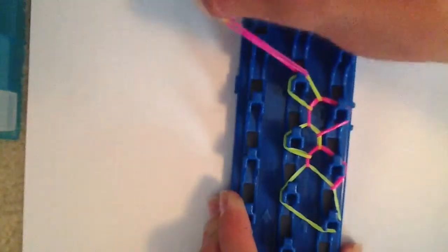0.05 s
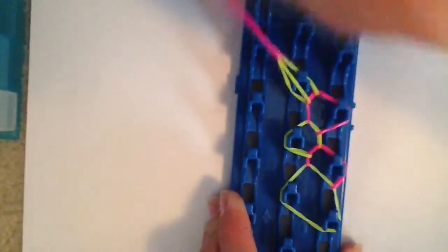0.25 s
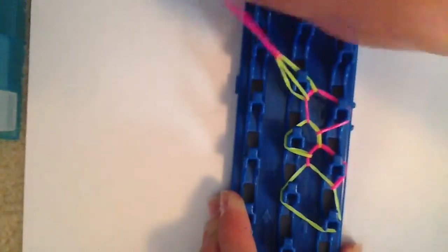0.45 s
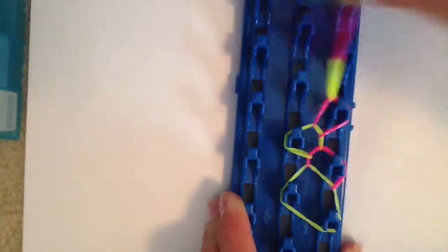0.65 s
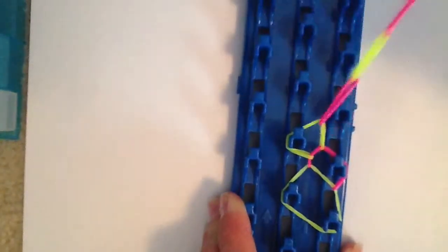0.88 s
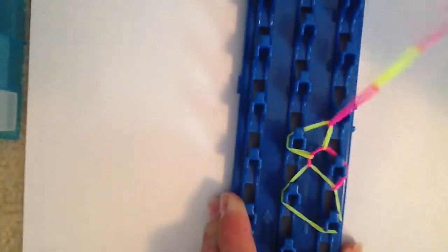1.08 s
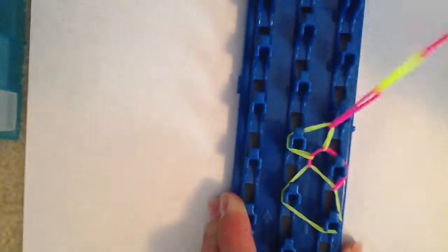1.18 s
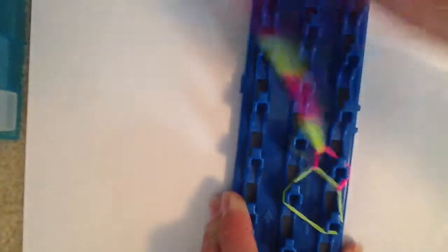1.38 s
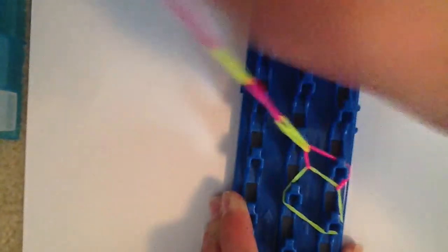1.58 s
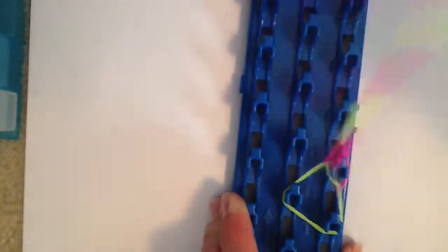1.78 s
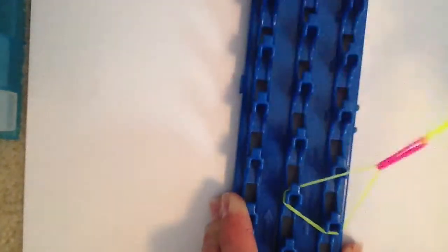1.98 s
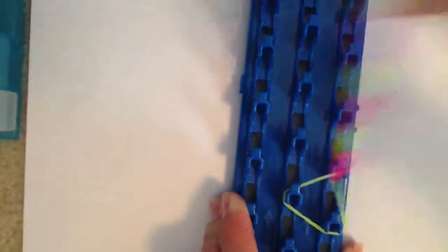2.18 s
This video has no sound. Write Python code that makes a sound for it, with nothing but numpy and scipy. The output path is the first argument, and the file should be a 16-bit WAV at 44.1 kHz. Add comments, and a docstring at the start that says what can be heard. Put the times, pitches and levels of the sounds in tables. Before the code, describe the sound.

Rubber bands snap off the pegs of a plastic loom, close to the microphone. After a soft rub, a sharp snap with a brief twang comes at 0.2 seconds. Four lighter snaps follow from 0.6 to 0.8. Soft rubbing leads to a double snap at 1.35, a sharp snap at 1.8 and a faint, higher twang at 1.9. The small room holds a faint rumble, hiss and hum.

```python
"""A chain of rubber bands is pulled off the pegs of a plastic loom on a table, close to the microphone.
Rubber rubs softly, then at 0.2 s a band slips off its peg, slaps the plastic and twangs briefly.
Four lighter snaps follow from 0.6 to 0.8 s. More rubbing leads to a double snap at 1.35 s,
then to a sharp snap at 1.8 s and a last faint one with a higher twang.
Throughout, a small room answers, over a low rumble, a steady hiss and a faint mains hum."""
import sys
import numpy as np
from scipy import signal
from scipy.fft import rfft, irfft, next_fast_len
from scipy.io import wavfile

SR = 44100
rng = np.random.default_rng(int(sys.argv[2]) if len(sys.argv) > 2 else 0)


def dump_mix(stems):
    """Bounce the given channels to the path in sys.argv[1] as a 16-bit WAV at rate SR."""
    frames = np.atleast_2d(stems).T  # one column per channel
    limited = np.clip(frames, -1, 1)  # hard clip at full scale
    pcm = np.round(limited * 32767).astype(np.int16)
    wavfile.write(sys.argv[1], SR, pcm)


N = 99225
ATTACK_S, PLUCK_S = 0.00031, 0.002

# centre_hz of thud, knock, clack, crack, air
REGION_CENTRES_HZ = [340, 1300, 3400, 9000, 13500]
# start_s, chatter_s, t60_s, peg_hz, peg_db, boom_db, thud_db, knock_db, clack_db, crack_db, air_db
BAND_SNAPS = [(.2059, 0.0032, 0.029, 1410, -24.5, -55, -34, -26.5, -23, -24.5, -18),
              (0.5725, .003, 0.047, 1170, -52, -65, -42.5, -42, -43, -40.5, -56),
              (0.5931, 0.0015, 0.017, 9750, -24.5, -53.5, -40, -33, -29.5, -24.5, -25.5),
              (0.7479, 0.00044, 0.033, 3890, -37, -54, -68, -53.5, -35.5, -44, -40.5),
              (.8108, 0.0015, 0.043, 1040, -42.5, -47, -38.5, -34, -36.5, -39.5, -45),
              (1.3416, 0.009, 0.032, 2850, -42, -58.5, -56, -37, -44.5, -45, -50),
              (1.354, .005, 0.031, 2077, -40, -48, -44.5, -40, -38.5, -69, -61),
              (1.7706, 0.0052, .017, 2120, -32.5, -78, -40.5, -36, -29.5, -33.5, -36),
              (1.925, 0.0034, 0.015, 4520, -49, -75, -81, -53.5, -44.5, -57.5, -66)]
def snaps():
    """Bands slip off and slap the plastic; loom and peg ring, and the room answers."""
    t, out = np.arange(SR // 3) / SR, np.zeros(N)
    for start_s, chatter_s, t60_s, peg_hz, peg_db, boom_db, *region_db in BAND_SNAPS:
        colour = list(zip(REGION_CENTRES_HZ, region_db))
        hit = slap(t, chatter_s, t60_s, colour)
        ring = loom_ring(t, colour) + peg_ring(t, peg_hz, peg_db) + loom_boom(t, boom_db)
        add(out, start_s, room(hit, send_db=3.5) + room(ring, send_db=1.5))
    return out


# freq_hz, gain_db
SLAP_SPECTRUM = [(30, -36), (70, -47), (150, 1.5), (300, 9), (800, 1.5), (1400, -3), (2500, 0.5),
                 (3400, -2), (5000, -4), (6500, -5), (9500, 0), (14000, -0.5), (15500, -3.5)]
def slap(t, chatter_s, t60_s, colour, split_hz=4500, slow_share=0.61, gain_db=1.5):
    """Rubber chatters against a peg; the lows die in one stage, the treble in two."""
    noise = rng.standard_normal(len(t))
    low = filtered(noise, lambda hz: 1 / (1 + (hz / split_hz) ** 4))
    decay_db = -60 * np.maximum(t - chatter_s, 0) / t60_s
    treble_decay = (1 - slow_share) * amp(decay_db / 0.37) + slow_share * amp(decay_db)
    chatter = onset(t, ATTACK_S) * (low * amp(decay_db / 0.94) + (noise - low) * treble_decay)
    return causal(chatter, lambda hz: amp(gain_db + along(SLAP_SPECTRUM, hz) + along(colour, hz)), 8192)


# pitch_hz, level_db
LOOM_MODES = [(335, -9), (600, -19), (690, -17), (1130, -11), (1460, -15), (1740, -18), (2060, -13),
              (2400, -14), (3290, -7), (3600, -11), (4200, -8), (7500, -8), (9700, -9), (11100, -11),
              (13400, -11)]
def loom_ring(t, colour, t60_at_1khz_s=0.06, scatter_db=4, gain_db=1):
    """Higher loom modes die sooner and smear more; each blow excites them a little differently."""
    ring = np.zeros(len(t))
    for hz, mode_db in LOOM_MODES:
        struck_db = gain_db + mode_db + along(colour, hz) + rng.normal(0, scatter_db)
        decay_db = -60 * t / t60_at_1khz_s * np.sqrt(hz / 1000)
        phase = 2 * np.pi * hz * t + phase_drift(t) * np.sqrt(hz / 3240)
        ring += amp(struck_db + decay_db) * np.sin(phase)
    return ring * onset(t, ATTACK_S)


def peg_ring(t, pitch_hz, level_db, t60_s=0.021, rise_s=0.00023):
    """The struck peg rings briefly in one smeared mode."""
    tone = np.sin(2 * np.pi * pitch_hz * t + phase_drift(t))
    return amp(level_db - 60 * t / t60_s) * tone * onset(t, rise_s)


def phase_drift(t, width_hz=52):
    """Slipping rubber touches a ring and makes its phase wander."""
    return np.cumsum(rng.standard_normal(len(t))) * np.sqrt(2 * np.pi * width_hz / SR)


# pitch_hz, level_db, t60_s
BOOM_MODES = [(341.2, -0.5, 0.2), (360, -25, .13), (431, -16, 0.18)]
def loom_boom(t, level_db):
    """Low modes of the loom on the table."""
    boom = sum(amp(db - 60 * t / t60_s) * np.sin(2 * np.pi * hz * t) for hz, db, t60_s in BOOM_MODES)
    return amp(level_db) * boom * onset(t, PLUCK_S)


# start_s, settled_hz, pitch_offset_share, level_db, t60_s, free_s, overtone_db
BAND_TWANGS = [(.209, 360, 0.063, -43, 0.71, 0.06, -19.5), (0.573, 226, 0.2, -47.5, 0.24, 0.11, -16),
               (.595, 349.3, 0.035, -49.5, 0.44, 0.02, -2.5),
               (0.747, 339.3, -0.0091, -51.5, 0.24, 0.066, -9.5),
               (.812, 306.7, -0.063, -48.5, 0.38, 0.185, -8.5),
               (1.346, 268, -0.16, -55.5, 0.34, 0.052, -36), (1.9263, 709, -0.069, -42, 0.092, .06, -6)]
def twangs(settle_s=0.014, mute_s=0.013, overtone_damping=0.46):
    """Each freed band settles to its new tension and rings until it touches something."""
    t, out = np.arange(SR // 3) / SR, np.zeros(N)
    for start_s, settled_hz, offset_share, level_db, t60_s, free_s, overtone_db in BAND_TWANGS:
        pitch_hz = settled_hz * (1 + offset_share * np.exp(-t / settle_s))
        phase = 2 * np.pi * np.cumsum(pitch_hz) / SR
        envelope = onset(t, PLUCK_S) * np.exp(-np.maximum(t - free_s, 0) / mute_s)
        tone = sum(amp(db - 60 * t / t60_s * (1 + overtone_damping * k)) * np.sin((k + 1) * phase)
                   for k, db in enumerate([0, overtone_db, overtone_db - 4.5]))
        add(out, start_s, room(amp(level_db) * envelope * tone, send_db=-4))
    return out


# freq_hz, gain_db
RUB_SPECTRUM = [(200, -18), (900, -6.5), (1700, -8), (2600, 1), (3400, -1), (5000, -9.5), (9000, -8.5),
                (15000, -10)]
# peak_s, rise_s, fall_s, level_db, tilt_db_per_octave
RUB_SWELLS = [(.005, .02, 0.031, -65.5, -1.5), (0.741, 0.019, 0.0061, -60.5, -1),
              (0.743, 0.0026, 0.0052, -48, 2), (0.8118, 0.0017, 0.0052, -45, -3.5),
              (1.223, 0.05, 0.06, -58, 0), (1.335, .012, .01, -61.5, 6.5), (1.654, .002, .003, -57, 7),
              (1.675, 0.067, 0.063, -65, 1.5), (1.724, 0.0046, 0.0035, -60, -3)]
def rubbing(grain_db=1, grain_rate_hz=500):
    """Grainy friction swells as stretched rubber creeps over the pegs."""
    t, out = np.arange(N) / SR, np.zeros(N)
    for peak_s, rise_s, fall_s, level_db, tilt in RUB_SWELLS:
        noise = rng.standard_normal(N)
        hiss = filtered(noise, lambda hz: amp(along(RUB_SPECTRUM, hz) + tilt * np.log2(hz / SR + 1e-3)))
        grain = np.interp(t * grain_rate_hz, np.arange(N), rng.standard_normal(N))
        swell = np.exp(-((t - peak_s) / np.where(t < peak_s, rise_s, fall_s)) ** 2)
        out += amp(level_db) * swell * unit(hiss * amp(grain_db * grain))
    return out


# freq_hz, t60_s
ROOM_DECAY = [(200, 0.36), (1000, .28), (3500, 0.31), (9000, 0.37), (15000, 0.19)]
# freq_hz, gain_db
ROOM_SPECTRUM = [(150, -13), (400, 6), (1200, -1.5), (3300, -3.5), (6000, -4), (10000, -4), (15000, -5.5)]
def room(x, send_db, tail_db=-19.5, build_s=0.011, wall_db=5.5, wall_s=0.033, spread_s=0.0074):
    """Direct sound plus a short diffuse tail that swells as the nearest walls answer."""
    hz, t, spectra = signal.stft(rng.standard_normal(SR // 2), SR, nperseg=256)
    swell = onset(t, build_s) * amp(wall_db * np.exp(-((t - wall_s) / spread_s) ** 2))
    decay = amp(-60 * t / along(ROOM_DECAY, hz)[:, None])
    tail = signal.istft(spectra * decay * swell, SR, nperseg=256)[1]
    tail /= np.linalg.norm(tail)
    response = amp(tail_db + send_db) * causal(tail, lambda f: amp(along(ROOM_SPECTRUM, f)))
    response[0] += 1  # direct path
    return signal.fftconvolve(x, response)


# freq_hz, relative_density_db
FLOOR_SPECTRUM = [(15, -51), (25, -26), (38, -30), (129, 1), (183, -2.5), (226, -8.5), (266, -8),
                  (339, -14.5), (409, -14), (468, -16.5), (682, -16.5), (1750, -20), (3330, -20),
                  (14200, -20), (15400, -20.5)]
TOP_HZ = 15450
def background(noise_db=-65, hum_db=-80, hum_hz=120):
    """Room rumble, microphone hiss and a faint mains hum."""
    noise = filtered(rng.standard_normal(N), lambda hz: amp(along(FLOOR_SPECTRUM, hz)) * (hz < TOP_HZ))
    hum = np.sin(2 * np.pi * hum_hz * np.arange(N) / SR)
    return amp(noise_db) * unit(noise) + amp(hum_db) * hum


def amp(db):
    """Decibels to gain."""
    return 10 ** (np.asarray(db) / 20)


def unit(x):
    """Scale to rms 1."""
    return x / np.sqrt(np.mean(x ** 2) + 1e-20)


def onset(t, rise_s):
    """Exponential rise from 0 to 1."""
    return 1 - np.exp(-t / rise_s)


def along(points, hz):
    """Interpolate (freq_hz, value) points on a log axis."""
    freq_hz, values = np.transpose(points)
    return np.interp(np.log(hz + 1), np.log(freq_hz + 1), values)


def filtered(x, gain):
    """Zero-phase filter by gain(hz)."""
    size = next_fast_len(len(x) + SR // 4)
    return irfft(rfft(x, size) * gain(np.fft.rfftfreq(size, 1 / SR)), size)[:len(x)]


def causal(x, gain, size=2048):
    """Minimum-phase filter by gain(hz); keeps attacks sharp."""
    cepstrum = irfft(np.log(gain(np.fft.rfftfreq(size, 1 / SR)) + 1e-9))
    cepstrum[1:size // 2] *= 2
    cepstrum[size // 2 + 1:] = 0
    return signal.fftconvolve(x, irfft(np.exp(rfft(cepstrum))))[:len(x)]


def add(track, start_s, sound):
    """Mix a sound into the track."""
    part = track[max(0, round(start_s * SR)):][:len(sound)]
    part += sound[:len(part)]


def scene(low_cut_hz=114):
    """Rubbing, snaps and twangs in the quiet room; such small things radiate little bass."""
    bands = rubbing() + snaps() + twangs()
    low_cut = signal.butter(2, low_cut_hz, "highpass", fs=SR, output="sos")
    return (signal.sosfilt(low_cut, bands) + background())[None]


def record(dry, edge_hz=70):
    """Steep low-pass at the band limit."""
    return filtered(dry[0], lambda hz: .5 - .5 * np.tanh((hz - TOP_HZ) / (2 * edge_hz)))[None]


dry = scene()
out = record(dry)
dump_mix(out)
```